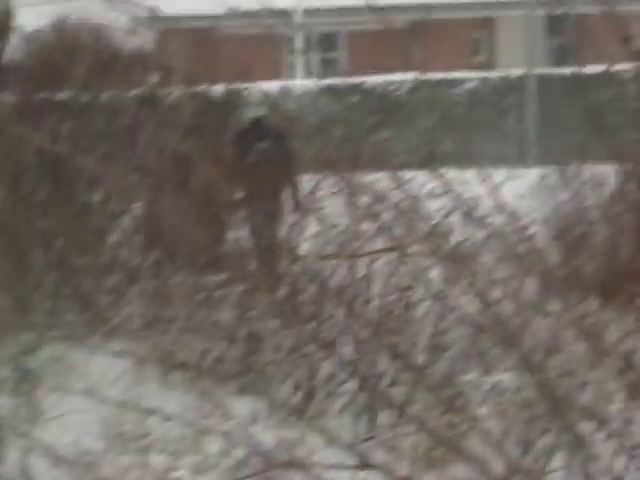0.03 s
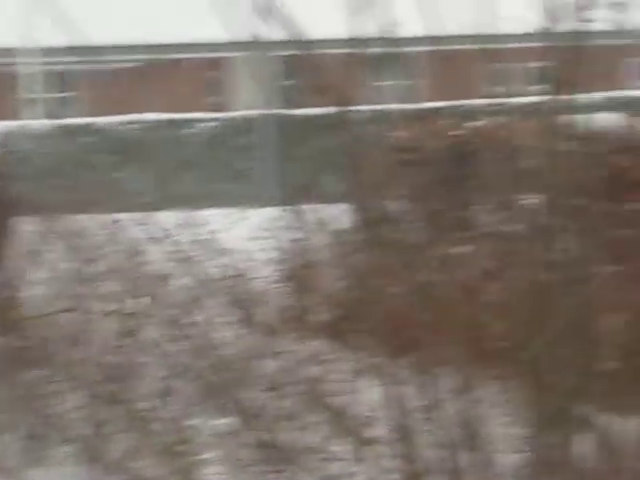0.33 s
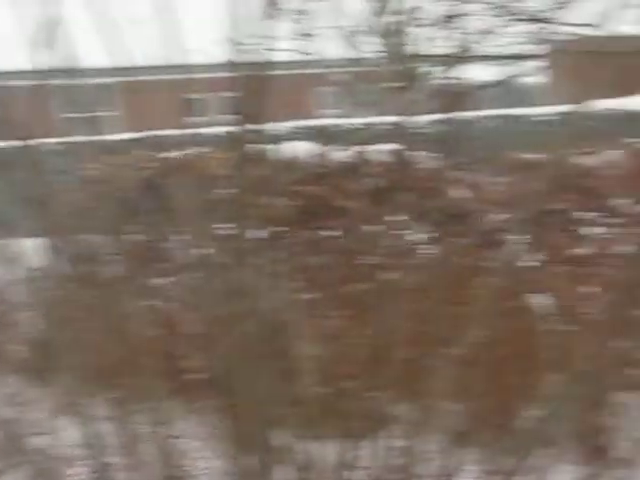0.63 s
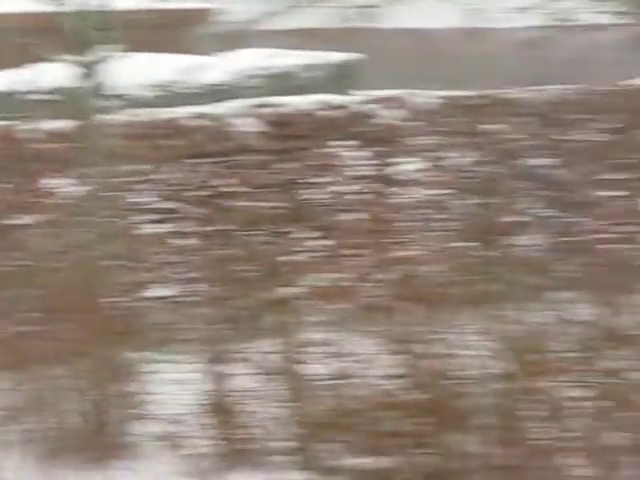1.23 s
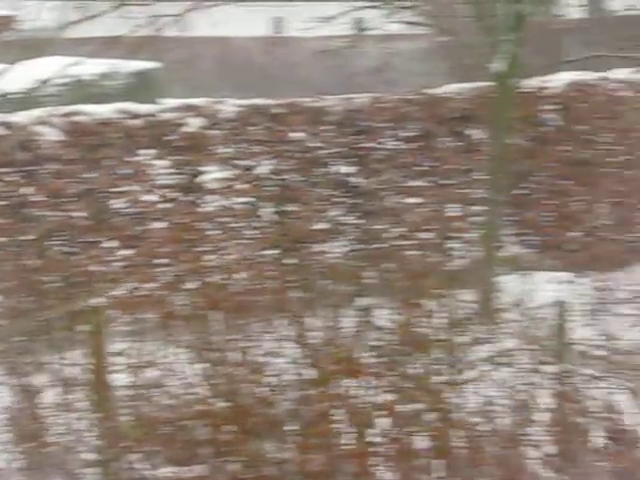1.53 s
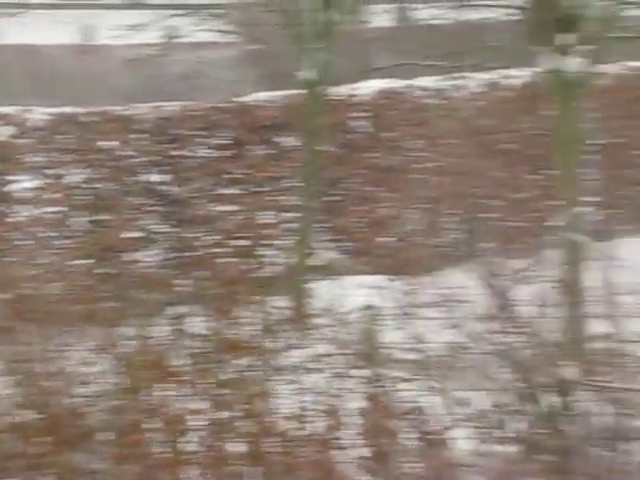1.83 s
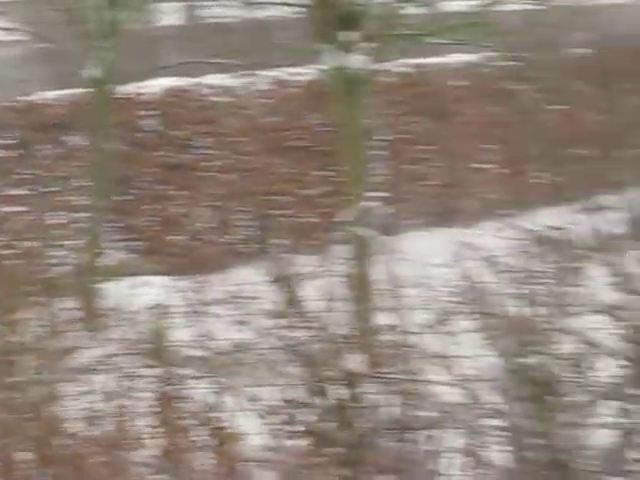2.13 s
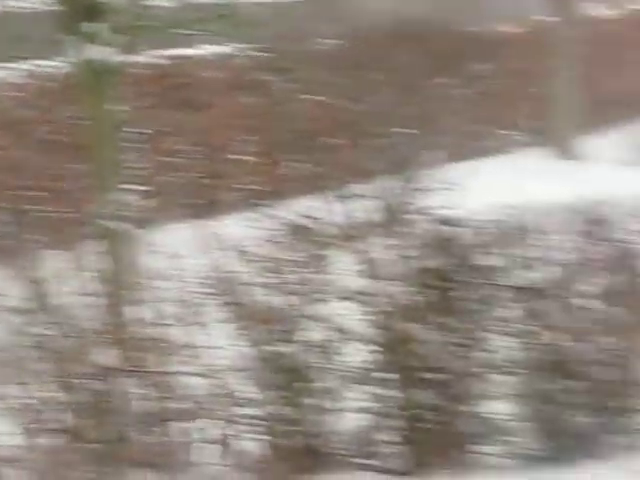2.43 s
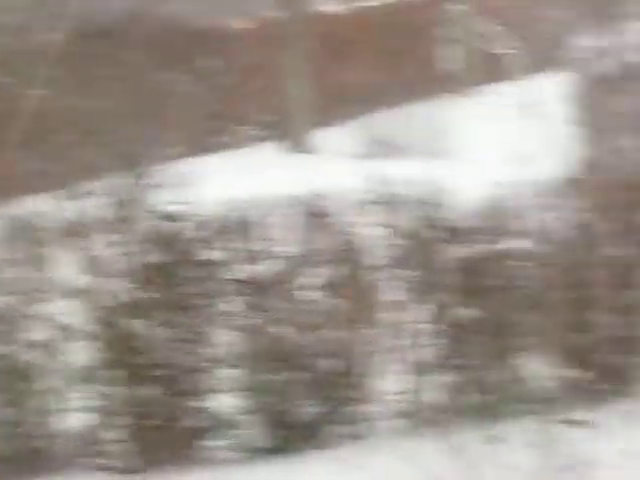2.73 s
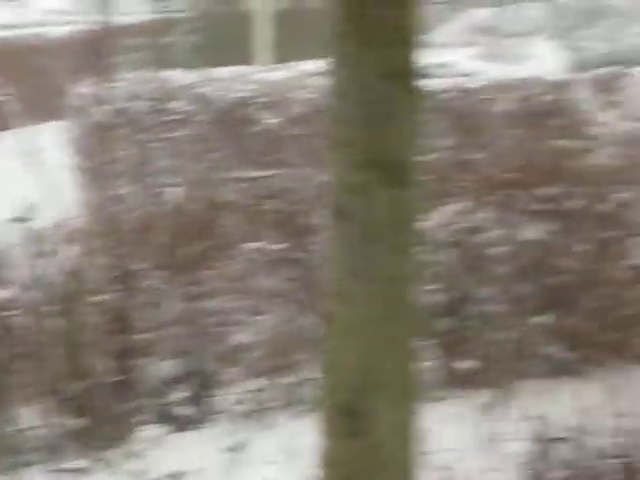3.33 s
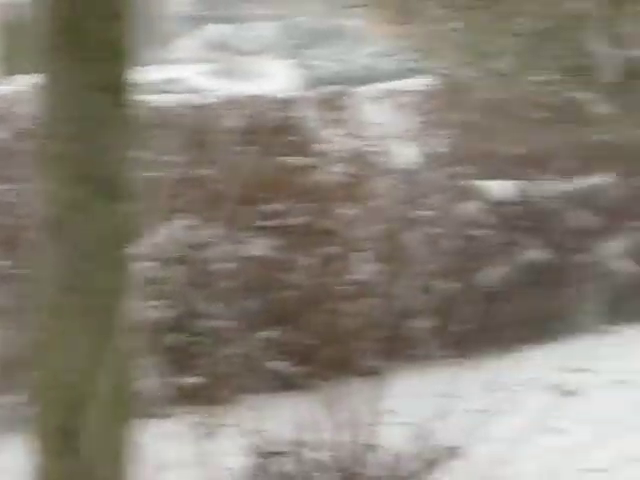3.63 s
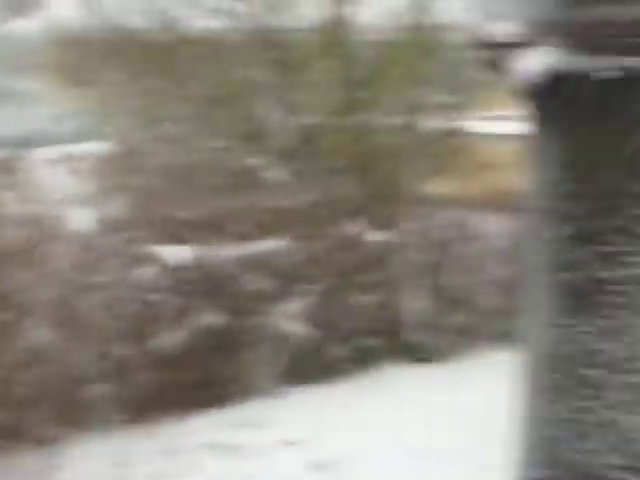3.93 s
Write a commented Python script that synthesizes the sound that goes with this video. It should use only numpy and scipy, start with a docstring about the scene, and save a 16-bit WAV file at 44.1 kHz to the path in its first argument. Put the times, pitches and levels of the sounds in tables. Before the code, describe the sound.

Gusty wind rumbles on the microphone outdoors, over a soft hiss and faint wavering drone.

```python
"""Gusts of wind buffet both ports of a hand-held microphone in a snowy garden, the right one harder. Eddies at
the ports rumble, flutter and slap. Hedges and blowing snow hiss behind them; the level of the hiss drops after
the hardest gust and slowly comes back. Dry leaves swell once, and twigs rasp and tick. A faint drone, probably
a small motor, wavers as it sags and recovers. The wind whistles faintly now and then, and a thin high whine
follows the hiss."""
import sys
import numpy as np
from scipy.fft import rfft, irfft, next_fast_len
from scipy.io import wavfile
from scipy.ndimage import uniform_filter1d, map_coordinates

SR = 44100
rng = np.random.default_rng(int(sys.argv[2]) if len(sys.argv) > 2 else 0)


def put_to_file(sound):
    """Save the sound as 16-bit audio at rate SR, in the file named by the first command-line argument."""
    columns = np.atleast_2d(sound).T  # one column per channel
    safe = np.clip(columns, -1, 1)
    whole_steps = np.round(safe * 32767)
    wavfile.write(sys.argv[1], SR, whole_steps.astype(np.int16))


N = 176400
TIME_S = np.arange(N) / SR


def amp(db):
    """Decibels to gain."""
    return 10 ** (np.asarray(db) / 20)


def unit(x):
    """Scale to rms 1."""
    return x / np.sqrt(np.mean(x ** 2) + 1e-20)


def along(points, hz):
    """Interpolate (Hz, value) points on a log frequency axis."""
    knot_hz, values = np.transpose(points)
    return np.interp(np.log(hz + 1), np.log(knot_hz + 1), values)


def curves(rows):
    """One value per sample for each column after the time."""
    knot_s, *columns = np.transpose(rows)
    return [np.interp(TIME_S, knot_s, column) for column in columns]


def wobble(knots_per_s):
    """Smooth random curve, rms near 1."""
    return map_coordinates(rng.standard_normal(N // 20), [TIME_S * knots_per_s], mode="wrap")


def filtered(x, response):
    """Filter x by the gain response(hz)."""
    size = next_fast_len(N + SR // 2)
    return irfft(rfft(x, size) * response(np.fft.rfftfreq(size, 1 / SR)), size)[..., :N]


def panned(pan_db):
    """Stereo gains of mean power 1; pan is left minus right."""
    gains = amp(np.array([[.5], [-.5]]) * pan_db)
    return gains / np.sqrt(np.mean(gains ** 2, axis=0))


def rush(spectrum, coherence):
    """Coloured stereo noise, rms 1; left-right coherence is a number or (Hz, value) points."""
    def mid_side_gains(hz):
        alike = np.full_like(hz, coherence) if np.isscalar(coherence) else along(coherence, hz)
        angle = np.arccos(np.clip(alike, -1, 1)) / 2
        return amp(along(spectrum, hz)) * np.array([np.cos(angle), np.sin(angle)])
    mid, side = filtered(rng.standard_normal((2, N)), mid_side_gains)
    return unit(np.array([mid + side, mid - side]))


def eddies(spectrum, window_samples):
    """Turbulent pressure at each port, levelled over the window."""
    pressure = rush(spectrum, coherence=.29)
    power = uniform_filter1d(uniform_filter1d(pressure ** 2, window_samples), window_samples)
    return pressure / np.sqrt(np.abs(power) + 1e-9)


# Puffs of wind. Each row: start in seconds, length in seconds, relative rumble and flutter levels
# in dB, pan in dB.
WIND_PUFFS = [(-.01, 0.086, -15, -37.5, -7), (.111, 0.078, -15, -22, -14), (0.473, .12, -17, -27, -12),
              (.642, 0.023, -17, -17.5, -23), (0.683, 0.1, -27, -21, -22), (0.786, 0.038, -20.5, -19.5, -8),
              (0.839, 0.024, -23, -25, -8), (1.313, .14, -33.5, -48.5, -23), (2.732, .12, -28, -46, -9),
              (2.863, 0.016, -11, -27.5, -34), (3.017, 0.067, -18.5, -29.5, -13),
              (3.165, 0.078, -19.5, -37.5, -10), (3.374, 0.05, -22.5, -35.5, 3),
              (3.56, 0.059, -17.5, -28.5, -10), (3.628, .064, -18, -35.5, 0)]
# Slow and fast eddies. Each row: frequency in Hz, relative level in dB.
RUMBLE_SPECTRUM = [(10, -18), (25, -11), (60, 3.5), (140, -1), (310, -25), (3000, -110)]
FLUTTER_SPECTRUM = [(90, -22), (180, 4), (290, -1.5), (750, -24.5), (2000, -40), (9000, -102)]


def puffs(attack_s=.0056, release_s=.026, lumps_db=2.5):
    """Each puff hits the ports with slow eddies that rumble and fast ones that flutter."""
    rumble_gain, flutter_gain = np.zeros((2, N)), np.zeros((2, N))
    for start_s, length_s, rumble_db, flutter_db, pan_db in WIND_PUFFS:
        attack = np.clip((TIME_S - start_s) / attack_s, 0, 1)
        release = np.exp(-np.maximum(TIME_S - start_s - length_s, 0) / release_s)
        envelope = panned(pan_db) * attack * release
        rumble_gain = np.hypot(rumble_gain, envelope * amp(rumble_db))  # powers add
        flutter_gain = np.hypot(flutter_gain, envelope * amp(flutter_db))
    lumps = amp(lumps_db * np.array([wobble(90), wobble(90)]))
    rumble = eddies(RUMBLE_SPECTRUM, window_samples=1200)
    flutter = unit(lumps * eddies(FLUTTER_SPECTRUM, window_samples=800))
    return rumble_gain * rumble + flutter_gain * flutter


# Breeze strength. Each row: time in seconds, relative level in dB.
BREEZE_LEVELS = [(0, -23.5), (.78, -23), (1.03, -43.5), (1.27, -50.5), (1.6, -36), (2.5, -35), (2.8, -32),
                 (4, -25)]
# Breeze eddies. Each row: frequency in Hz, relative level in dB.
BREEZE_SPECTRUM = [(10, -10), (28, -1.5), (50, -4.5), (180, -16.5), (3000, -115)]


def breeze():
    """A low breeze sways on each port separately."""
    level_db, = curves(BREEZE_LEVELS)
    sway_db = 2.27 * np.array([wobble(26.97), wobble(16)])
    return amp(level_db + sway_db) * eddies(BREEZE_SPECTRUM, window_samples=4000)


# Slaps of air. Each row: time in seconds, peak in dB before panning.
AIR_SLAPS = [(.671, -13), (.843, -21)]


def slaps(sigma_s=.00014):
    """Single pressure spikes hit the right port in the hardest gust."""
    spikes = sum(amp(db) * np.exp(-.5 * ((TIME_S - at_s) / sigma_s) ** 2) for at_s, db in AIR_SLAPS)
    return panned(-20) * spikes


# Hiss strength. Each row: time in seconds, hedge level in dB, snow level in dB.
HISS_LEVELS = [(0, -41, -48.5), (.29, -45.5, -56), (.5, -43, -51.5), (.65, -44.5, -52.5), (.67, -49, -55),
               (.85, -53.5, -64.5), (1.38, -44, -59), (1.52, -40, -51), (2.87, -33, -61), (2.9, -36.5, -47),
               (4, -33.5, -50.5)]
# Hedge noise and its colouring at the right port. Each row: frequency in Hz, relative level in dB.
HEDGE_SPECTRUM = [(60, -8), (200, 14), (600, 8), (1200, 7), (2100, 0), (4000, -6), (15000, -24.5)]
RIGHT_PORT_RESPONSE = [(1100, 0), (2000, 4), (3680, 5), (4200, -0.5), (6200, 1), (9500, -8.5)]
# Stereo likeness of the hedges. Each row: frequency in Hz, coherence from 0 to 1.
HEDGE_COHERENCE = [(300, 1), (4000, 0.19)]


def hedges():
    """Wind rushes through hedges in the middle range."""
    level_db, _ = curves(HISS_LEVELS)
    noise = rush(HEDGE_SPECTRUM, HEDGE_COHERENCE)
    coloured = filtered(noise, lambda hz: amp([np.zeros_like(hz), along(RIGHT_PORT_RESPONSE, hz)]))
    return amp(level_db) * unit(coloured)


# Blowing snow. Each row: frequency in Hz, relative level in dB.
SNOW_SPECTRUM = [(1500, 0), (8000, -0.5), (15500, -4.5)]


def snow():
    """Blowing snow fizzes all around; its level flickers."""
    _, level_db = curves(HISS_LEVELS)
    return rush(SNOW_SPECTRUM, coherence=.13) * amp(level_db + wobble(50))


# Swell of the leaves. Each row: time in seconds, level in dB.
LEAF_LEVELS = [(1.95, -70), (2.2, -45.5), (2.62, -44), (2.86, -40), (2.9, -46.5), (3.6, -59)]
# Leaf rustle. Each row: frequency in Hz, relative level in dB.
LEAF_SPECTRUM = [(2500, -8), (7000, -4.5), (14000, -14.5)]


def leaves():
    """Dry leaves rustle up to one crest and drop away."""
    level_db, = curves(LEAF_LEVELS)
    return rush(LEAF_SPECTRUM, coherence=.13) * amp(level_db)


# Rasps, one long, three brief. Each row: centre in seconds, Gaussian sigma in seconds, level in dB.
TWIG_RASPS = [(.2, 0.56, -47.5), (0.381, .0074, -42), (.447, 0.012, -41), (.513, 0.0094, -35.5)]
# Twig friction. Each row: frequency in Hz, relative level in dB.
RASP_SPECTRUM = [(600, -0.5), (1400, 3.5), (2100, -1), (7000, -75)]


def rasps():
    """Swells of dry mid-range scratching, as of twigs rubbing."""
    envelope = sum(amp(db) * np.exp(-.5 * ((TIME_S - centre_s) / sigma_s) ** 2)
                   for centre_s, sigma_s, db in TWIG_RASPS)
    return envelope * panned(-1.7) * rush(RASP_SPECTRUM, HEDGE_COHERENCE)


# Motor speed, labouring and then picked up. Each row: time in seconds, fundamental in Hz.
LABOURING_SPEED = [(.93, 269.8), (1.21, 281), (1.38, 262), (1.435, 281.3), (1.47, 265.3), (1.57, 264.7),
                   (1.81, 245.8), (1.89, 264), (2.04, 246.9), (2.17, 256.7), (2.32, 250.6), (2.39, 240),
                   (2.45, 252)]
RUNNING_SPEED = [(2.48, 267.6), (2.716, 262.1), (2.772, 269.5), (2.834, 259.0), (2.856, 268),
                 (2.978, 266.6), (2.996, 255.2), (3.03, 269.7), (3.292, 260.9), (3.622, 265.8),
                 (3.668, 254.2), (3.736, 272.6), (3.75, 262.5), (3.842, 267.2), (3.86, 258.8),
                 (3.96, 262.6), (4.0, 254.3)]
# Motor strength. Each row: time in seconds, level at mean speed in dB.
MOTOR_LEVELS = [(.92, -72), (.95, -52), (1.22, -48), (1.39, -56.5), (1.435, -40.5), (1.47, -44),
                (1.84, -40.5), (1.89, -35.5), (2.465, -38), (2.475, -33.5), (4, -34.5)]
# Housing resonances. Each row: frequency in Hz, relative gain in dB.
HOUSING_RESPONSE = [(780, -10), (970, -6), (1065, 3), (1230, -5.5), (1350, 1), (1520, 5.5), (1660, 0),
                    (1800, -19.5)]
# Balance of the harmonics. Each row: frequency in Hz, pan in dB.
HARMONIC_PAN = [(800, -7), (1600, -15)]


def motor(waver=.008, jitter=.012, sag_span_hz=24, shake_db=2, db_per_hz=.25):
    """A motor, louder when fast and rougher when slow, slides harmonics through housing resonances."""
    hz, = curves([*LABOURING_SPEED, *RUNNING_SPEED])
    roughness = 1 + np.clip((hz.mean() - hz) / sag_span_hz, 0, 1)
    hz = hz * (1 + waver * wobble(28))
    level_db = curves(MOTOR_LEVELS)[0] + db_per_hz * (hz - hz.mean())
    phase = 2 * np.pi * np.cumsum(hz * (1 + roughness * jitter * wobble(260))) / SR
    tone = np.zeros((2, N))
    for harmonic in range(3, 10):
        pan_db = along(HARMONIC_PAN, harmonic * hz.mean())
        gain_db = along(HOUSING_RESPONSE, harmonic * hz) + shake_db * wobble(70)
        tone += panned(pan_db) * amp(gain_db) * np.sin(harmonic * phase)
    return unit(tone) * amp(level_db)


# Whistles. Each row: start in seconds, length in seconds, start and end pitch in Hz, level in dB.
WIND_WHISTLES = [(-.02, 0.074, 1424, 1526, -43.5), (1.929, .11, 974.5, 876, -41),
                 (3.276, 0.1885, 874, 926, -37.5)]


def whistles(jitter=.0114):
    """The wind whistles in short breathy glides that swell and fade."""
    tones = np.zeros(N)
    for start_s, length_s, start_hz, end_hz, db in WIND_WHISTLES:
        progress = np.clip((TIME_S - start_s) / length_s, 0, 1)
        hz = (start_hz + (end_hz - start_hz) * progress) * (1 + jitter * wobble(200))
        envelope = amp(db) * np.sqrt(2) * np.sin(np.pi * progress)
        tones += envelope * np.sin(2 * np.pi * np.cumsum(hz) / SR)
    return panned(3) * tones


# Twig or flake contact. Each row: start in seconds, pitch in Hz, peak in dB.
TWIG_TICKS = [(.775, 4570, -43)]


def ticks(decay_s=.0018):
    """A tiny contact rings for a few milliseconds."""
    rings = np.zeros(N)
    for start_s, hz, db in TWIG_TICKS:
        age_s = np.maximum(TIME_S - start_s, 0)
        envelope = amp(db) * (TIME_S > start_s) * np.exp(-age_s / decay_s)
        rings += envelope * np.sin(2 * np.pi * hz * age_s + wobble(1500))
    return rings


def whine(pitch_hz=7865, fuzz_hz=30, below_snow_db=16):
    """A faint, fuzzy high tone sinks with the snow's hiss."""
    _, snow_db = curves(HISS_LEVELS)
    level_db = np.minimum(snow_db, np.median(snow_db)) - below_snow_db
    phase = 2 * np.pi * np.cumsum(pitch_hz + fuzz_hz * wobble(120)) / SR
    return amp(level_db) * np.sqrt(2) * np.sin(phase)


def scene():
    """Everything as it reaches the two ports."""
    buffeting = np.sqrt(2) * (breeze() + puffs()) + slaps()
    hiss = (hedges() + snow() + leaves()) * amp(.5 * wobble(25))  # shared flicker
    return buffeting + hiss + rasps() + motor() + whistles() + ticks() + whine()


def record(dry):
    """The recorder rounds off peaks near full scale and cuts everything above its band limit."""
    band_limit_hz = 15750
    rounded = dry / (1 + np.abs(dry) ** 8) ** (1 / 8)
    return filtered(rounded, lambda hz: hz < band_limit_hz)


dry = scene()
out = record(dry)
put_to_file(out)
```